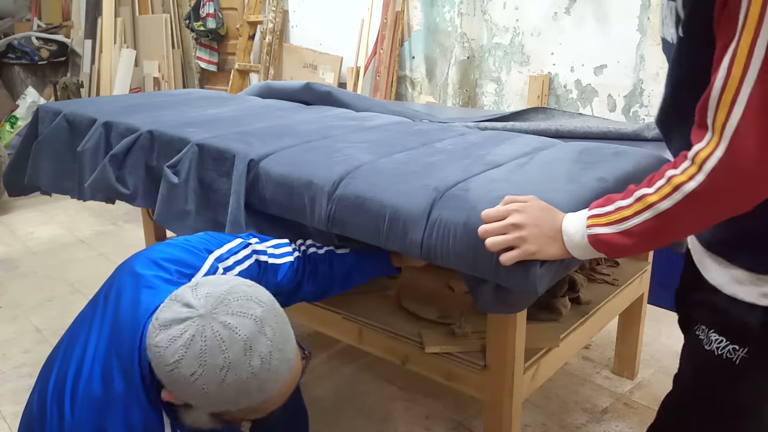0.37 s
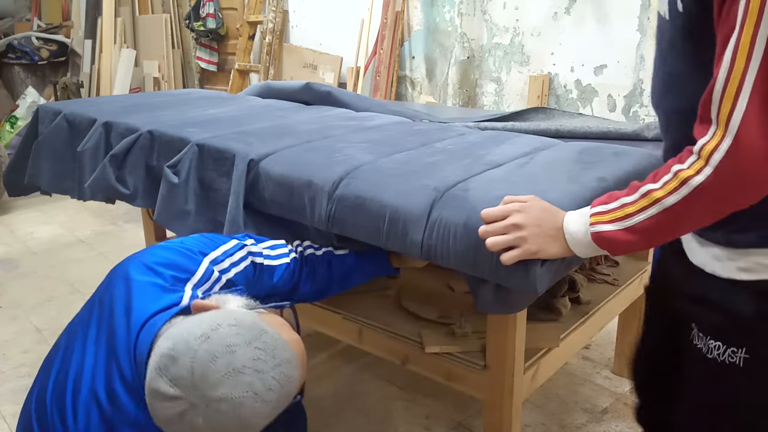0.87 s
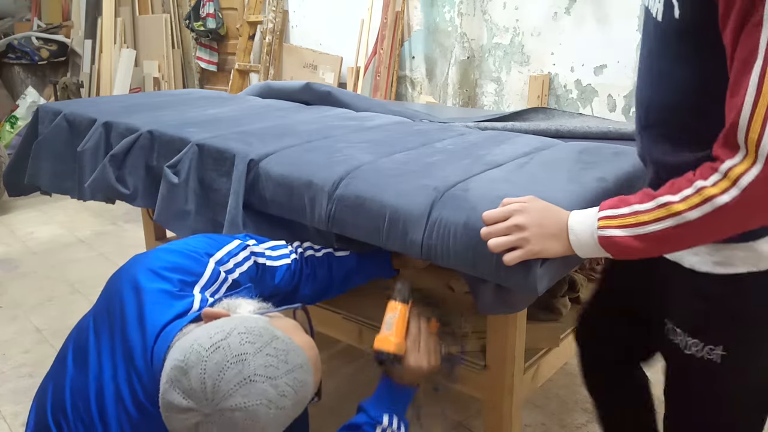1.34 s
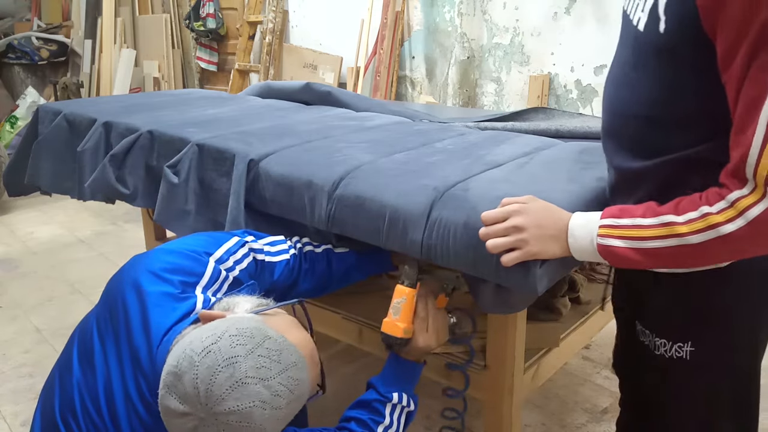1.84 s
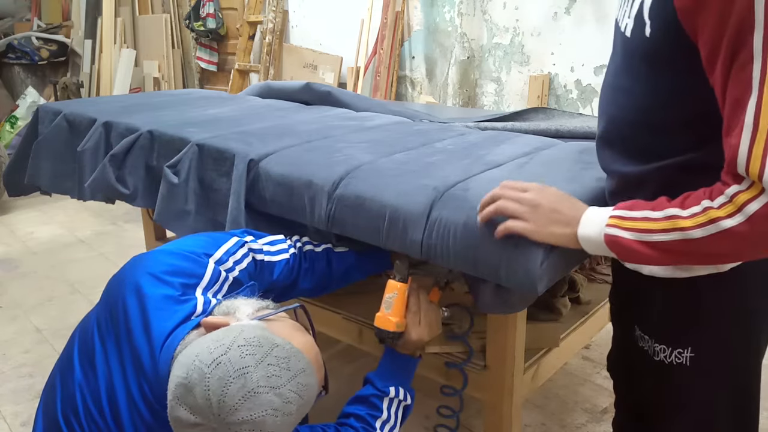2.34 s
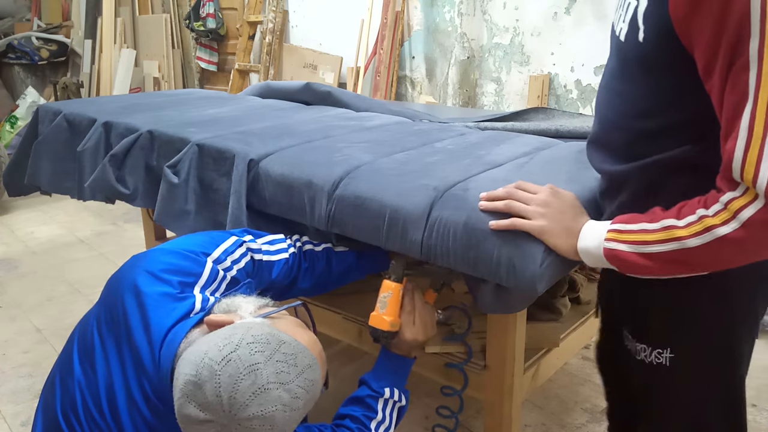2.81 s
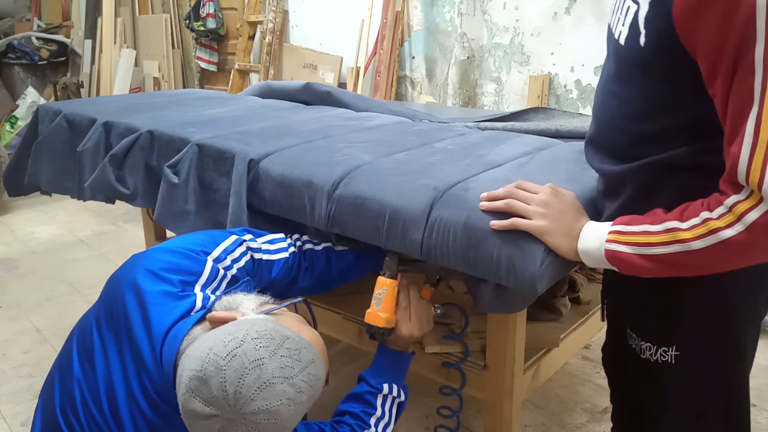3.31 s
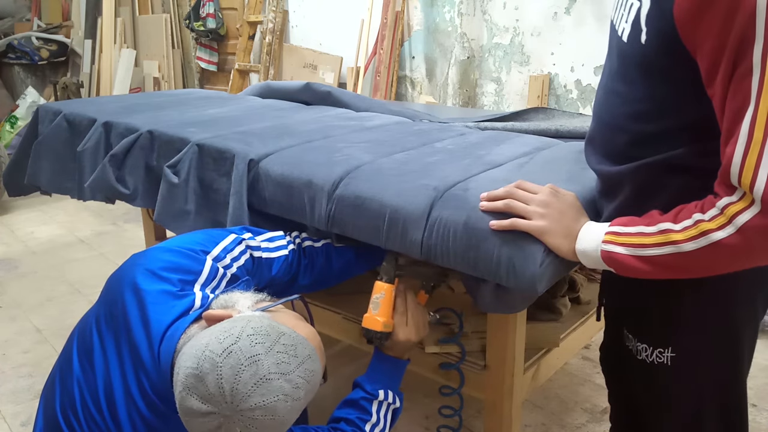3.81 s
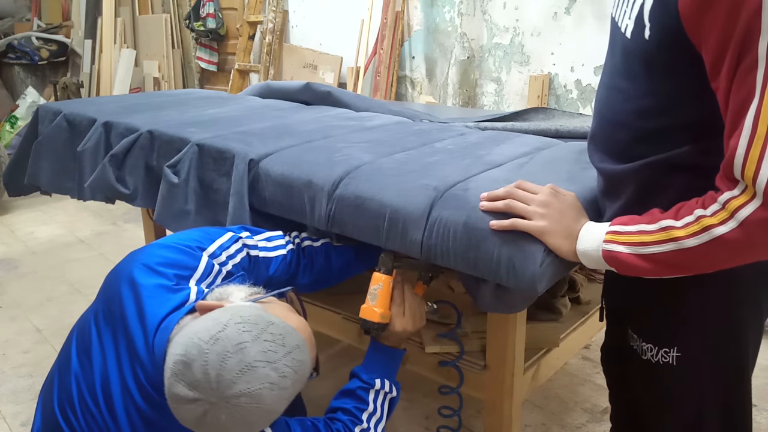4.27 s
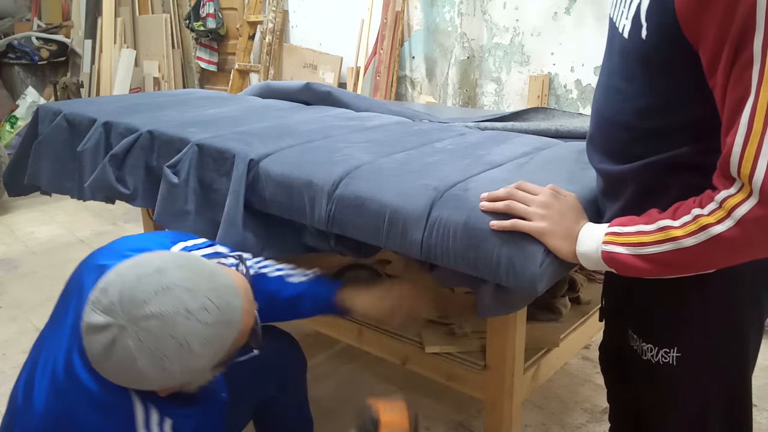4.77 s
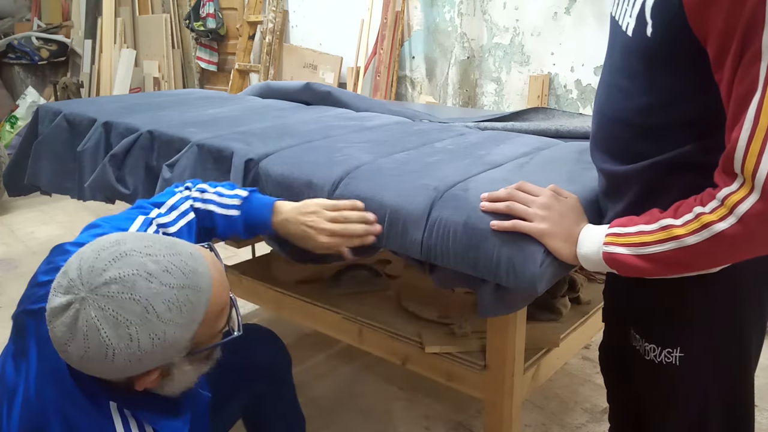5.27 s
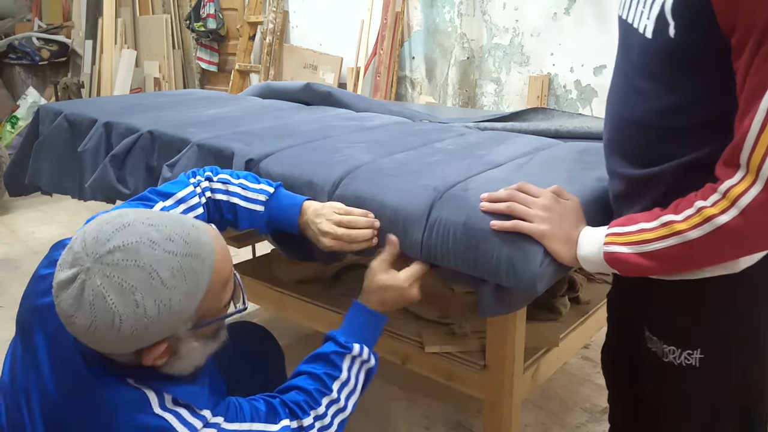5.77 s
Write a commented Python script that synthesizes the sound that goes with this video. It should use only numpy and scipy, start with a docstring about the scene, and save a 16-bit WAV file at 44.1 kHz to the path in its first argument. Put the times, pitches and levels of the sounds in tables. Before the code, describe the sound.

A bare, reverberant workshop with low air noise and very faint, wavering distant machine hum. Soft cloth and shoe scuffs begin at once, with small strokes around 0.25 s. From 0.68 to 0.84 s the gun knocks against wood in a quick clattering cluster with a short metallic ring. Brighter grainy rustles follow, strongest near 1.1 and 1.45 s, fading before 1.9 s. A pneumatic staple gun then fires at about 1.95, 2.53, 3.43 and 4.28 s. Each shot has a tiny valve tick, an abrupt dry crack into wood, a thin high leak for roughly 0.13-0.15 s, then a fierce, bright exhaust puff and small piston thud, with echoes dying over under a second. Faint handling ticks come at 4.8-4.9 s. At 5.1 s the gun lands on the hard floor with a loud double clunk. Quiet cloth movement and a low, lumpy rumble close the scene around 5.5-6 s.

```python
"""Staple gun in a workshop

A pneumatic staple gun drives four staples into a wooden frame in a bare, echoing workshop.
Each shot is shaped noise: valve tick, piston slam, leak while the trigger is held, exhaust puff.
Knocks ring the modes of the gun body; cloth and shoes scuff as grainy noise with swelling strokes.
Air noise and wavering machine tones lie below. A limiter rides the level."""
import sys
import numpy as np
from scipy import signal
from scipy.fft import rfft, irfft
from scipy.io import wavfile
from scipy.ndimage import uniform_filter1d, minimum_filter1d

SR = 44100
rng = np.random.default_rng(int(sys.argv[2]) if len(sys.argv) > 2 else 0)


def transcribe(signal):
    """Save signal, clipped to [-1, 1], as a 16-bit WAV file at the path in sys.argv[1]."""
    frames = np.atleast_2d(signal).T
    limited = np.clip(frames, -1, 1)
    pcm = np.round(limited * 32767).astype(np.int16)
    wavfile.write(sys.argv[1], SR, pcm)


N = 259308

# Shots: (piston blow [s], trigger held [s], valve tick [dB], blow [dB], exhaust [dB])
SHOTS = [(1.9452, .1300, -28.5, -6, -4), (2.5322, .1265, -26, -5.5, -6), (3.4278, .1412, -21, -7, -8),
         (4.2753, .1467, -29, -7.5, -5)]
# Spectrum of the piston blow: (frequency [Hz], relative density [dB per Hz])
BLOW_SPECTRUM = [(44, -32.5), (75, -7.5), (240, -8.5), (286, -4), (409, -4.5), (572, -7.5), (800, -3),
                 (1340, -5), (2730, -2.5), (4780, -7), (7300, -3.5), (9130, -12.5), (11400, -5.5),
                 (15600, -22)]
# Spectrum of the exhaust: (frequency [Hz], relative density [dB per Hz])
EXHAUST_SPECTRUM = [(350, -36), (600, -19.5), (1120, -13), (1960, -14), (3680, 0), (5030, -6), (6700, 5),
                    (7370, 6), (9420, -1.5), (10600, 0), (12200, -5), (14300, -7.5), (15800, -25.5)]
# Resonances of the valve leak: (frequency [Hz], width [Hz], relative level [dB])
LEAK_RESONANCES = [(11300, 1900, 9.5), (6836, 400, 9), (13500, 480, -19.5)]
# Sharp core of the exhaust: (delay [s], swell [s], steady [s], fade [s], share [1])
JET = (.007, .008, .003, .003, .55)
# Broader rush around the core: (swell [s], steady [s], fade [s])
VENTING = (.003, .015, .016)
VALVE_LEAD_S = .016   # the valve ticks this long before the blow
LEAK_DB, REBOUND_DB, REBOUND_AFTER_S = -19.5, -9, 0.015   # against the blow
THUD_DB, THUD_AFTER_S = -9.5, .028   # piston return against the exhaust
BLOW_ECHO_DB, PUFF_ECHO_DB = -20, -24   # echoes against their sources


def staple_gun(room):
    """Impact and jet noise: valve tick, blow, one rebound in the wood, leak, exhaust, piston return."""
    blow, puff, white = coloured(BLOW_SPECTRUM), coloured(EXHAUST_SPECTRUM), rng.standard_normal(N)
    crackle = from_db(4.4 * drift(1500))   # the blow is a cluster of metal and wood contacts
    leak = rms_one(sum(from_db(db) * resonance(white, hz, width) for hz, width, db in LEAK_RESONANCES))
    valve = coloured(BLOW_SPECTRUM, tilt_db=4.0)
    thud = rms_one(resonance(rng.standard_normal(N), 800, 1200))
    jet_delay, *jet_times, jet_share = JET
    out = np.zeros(N)
    for hit, held, trigger_db, blow_db, vent_db in SHOTS:
        trigger, vent = hit - VALVE_LEAD_S, hit + held
        back = vent + THUD_AFTER_S
        tick = swell(trigger, .0015, .001, .003)
        tick += .35 * swell(trigger, .002, hit - trigger, .002)   # weaker noise up to the blow
        out += from_db(trigger_db) * valve * tick

        out += from_db(blow_db) * blow * crackle * swell(hit, .002, .005, .0025)
        out += echo_of_hit(hit, blow_db + BLOW_ECHO_DB, BLOW_SPECTRUM, room)
        out += from_db(blow_db + REBOUND_DB) * thud * swell(hit + REBOUND_AFTER_S, .001, .003, .003)
        out += from_db(blow_db + LEAK_DB) * leak * swell(hit, 0.0056, vent - hit, 0.0045)

        jet = jet_share * swell(vent + jet_delay, *jet_times)
        rush = (1 - jet_share) * swell(vent, *VENTING)
        out += from_db(vent_db) * puff * (jet + rush)
        out += echo_of_hit(vent + .008, vent_db + PUFF_ECHO_DB, EXHAUST_SPECTRUM, room)
        out += from_db(vent_db + THUD_DB) * thud * swell(back, .001, .002, .002)
        out += echo_of_hit(back, vent_db + THUD_DB + BLOW_ECHO_DB, BLOW_SPECTRUM, room)
    return out


# The gun knocks on wood and floor: (time [s], click level [dB], body ring against the click [dB],
# echoes against the click [dB], pitch that the blow favours [Hz])
KNOCKS = [(0.677, -32, -8.5, -25.5, 600), (0.7213, -24, -11, -30.5, 3400), (0.7927, -19, -9.5, -30.5, 5965),
          (0.8355, -20.5, -16, -36, 1500), (1.908, -40, -20, -26.5, 7000), (3.395, -55.5, -13, -31.5, 7060),
          (4.833, -43, -12.5, -34.5, 7000), (4.924, -48, -9, -28.5, 7000),
          (5.073, -46.5, -11.5, -31.5, 5400), (5.104, -10.5, -8, -32, 499.5),
          (5.121, -19, -10, -34.5, 3400)]
# Modes of the gun body: (frequency [Hz], relative level [dB], t60 [s])
GUN_BODY_MODES = [(225, -6.5, 0.073), (1500, 3.5, 0.05), (3407, 1, 0.045), (5400, -25, 0.015),
                  (7088, 4.5, 0.019)]
# Spectrum of a knock on the wooden shelf: (frequency [Hz], relative density [dB per Hz])
SHELF_SPECTRUM = [(35, -59.5), (60, -38.5), (222, 3), (715, -7), (1470, -4.5), (1860, -12), (2650, -7),
                  (6900, -16), (12400, -26), (16000, -45.5)]
# Spectrum of a knock on the hard floor: (frequency [Hz], relative density [dB per Hz])
FLOOR_SPECTRUM = [(59, -50), (100, -19), (220, -1.5), (387, -8), (554, -12.5), (900, -13), (1200, -6),
                  (1450, -1.5), (1750, -8.5), (2430, -12.5), (3480, -8), (5540, -20.5), (8100, -12.5),
                  (15600, -37.5)]
FLOOR_FROM_S = 5   # from here on the echoes are those of the floor
FAVOUR_DB_PER_OCTAVE = 6   # modes away from the favoured pitch ring less


def knocks(room):
    """Modal excitation: a crack of a few ms, and body modes with new strengths at each knock; echoes."""
    crack, out = coloured(SHELF_SPECTRUM, tilt_db=2.0), np.zeros(N)
    for s, db, ring_db, echo_db, pitch_hz in KNOCKS:
        surface = SHELF_SPECTRUM if s < FLOOR_FROM_S else FLOOR_SPECTRUM
        out += from_db(db - 9.0) * crack * swell(s, .0004, 0.0017, 0.0036)
        out += echo_of_hit(s, db + echo_db, surface, room)

    times, click_db, ring_db, _, pitch_hz = np.array(KNOCKS).T
    at = np.round(times * SR).astype(int)
    for hz, level_db, t60 in GUN_BODY_MODES:
        chance_db = rng.normal(0, 2.66, len(at))
        off_pitch_db = FAVOUR_DB_PER_OCTAVE * np.abs(np.log2(hz / pitch_hz))
        clicks = np.full(N, 1e-18)
        clicks[at] = from_db(click_db + ring_db + level_db + chance_db - off_pitch_db)
        r, w = from_db(-60 / (t60 * SR)), 2 * np.pi * hz / SR   # pole radius and angle
        out += signal.lfilter([0, np.sin(w)], [1, -2 * r * np.cos(w), r * r], clicks)
    return out


# Strokes of cloth and shoes: (start [s], swell [s], steady [s], level [dB], brightness [dB])
SCUFFS = [(0.0, 0.0033, 0.179, -57, 3), (0.23, 0.0065, 0.0097, -38.5, 3.5), (.25, 0.0095, 0.011, -42, -8),
          (.45, .05, 0.24, -70, 5), (0.841, 0.0059, 0.0082, -41, 7), (0.95, .08, .03, -46.5, 1.5),
          (1.055, 0.046, 0.06, -37, -0.5), (1.305, 0.0667, .035, -43.5, 9),
          (1.428, 0.0254, 0.0467, -32.5, 4.5), (1.6, 0.0282, 0.0973, -41, 0),
          (1.8, .04, 0.099, -54.5, -10.5), (4.76, .05, 0.17, -55.5, -3), (5.035, .03, .02, -54, -7),
          (5.45, .05, 0.336, -59, -5), (5.752, .012, .1, -57, -36)]
# Spectrum of the friction: (frequency [Hz], relative density [dB per Hz])
SCUFF_SPECTRUM = [(59, -41), (100, -4), (197, -8), (234, -3), (558, 4), (1870, 3.5), (2170, 5), (4870, -4),
                  (7450, -4.5), (12400, -20.5), (16000, -31)]
STROKE_FADE_S, HISS_FADE_S = 0.0527, 0.032   # a stroke trails off, its hiss sooner


def scuffs():
    """Friction noise with random grain; a brighter stroke has more hiss over 4.5 kHz."""
    grain = from_db(0.6 * drift(300) + 1.3 * drift(40))
    low_pass, high_pass = (signal.butter(2, 4500, kind, fs=SR, output="sos") for kind in ("low", "high"))
    low = signal.sosfilt(low_pass, coloured(SCUFF_SPECTRUM))
    high = signal.sosfilt(high_pass, coloured(SCUFF_SPECTRUM))
    body, hiss = np.zeros(N), np.zeros(N)
    for s, rise, hold, db, bright_db in SCUFFS:
        body += from_db(db) * swell(s, rise, hold, STROKE_FADE_S)
        hiss += from_db(db + bright_db) * swell(s, rise, hold, HISS_FADE_S)
    return grain * (body * low + hiss * high)


# Faint thin tones that come and go: (start [s], steady [s], level [dB], frequency [Hz], width [Hz])
TONES = [(0.0, 0.3, -60.5, 806.4, 40), (.44, 0.126, -64, 1105, 24.1), (.44, 0.173, -60, 554.3, 25),
         (.975, 0.058, -53.5, 6560, 59.5)]
# Low lumpy rumble near the end: (start [s], swell [s], steady [s], fade [s], level [dB])
RUMBLE = (5.6, .13, .13, .1, -51)
TONE_SWELL_S, TONE_FADE_S = 0.0366, .04


def small_sounds():
    """Narrow-band noise: sharp resonances give wavering tones, broad low ones a lumpy rumble."""
    white, out = rng.standard_normal(N), np.zeros(N)
    for s, hold, db, hz, width in TONES:
        tone = rms_one(resonance(resonance(white, hz, width), hz, width))
        out += from_db(db) * swell(s, TONE_SWELL_S, hold, TONE_FADE_S) * tone
    *rumble_times, rumble_db = RUMBLE
    rumble = rms_one(resonance(resonance(rng.standard_normal(N), 216, 300), 226, 300))
    return out + from_db(rumble_db + 1.7 * drift(40)) * swell(*rumble_times) * rumble


# Spectrum of the workshop noise: (frequency [Hz], relative density [dB per Hz])
AIR_SPECTRUM = [(20, -23), (50, -7), (84, -5.5), (200, -8), (400, -6), (800, -11.5), (1500, -15.5),
                (2600, -14.5), (3700, -16.5), (4600, -34), (7200, -29.5), (9500, -40.5), (16000, -52.5)]
# Distant machine tones: (frequency [Hz], peak level [dB])
HUM = [(199.5, -60), (301, -65.5), (371.4, -61.5), (743, -65.5)]
AIR_DB = -54.5


def background():
    """Stationary noise of the workshop air plus machine tones wavering in level and phase."""
    t = np.arange(N) / SR
    out = from_db(AIR_DB + 1.6 * drift(3.87)) * coloured(AIR_SPECTRUM)
    for hz, db in HUM:
        out += from_db(db + 1.5 * drift(9)) * np.sin(2 * np.pi * hz * t + 1.1 * drift(9))
    return out


# Reverberation time of the workshop: (frequency [Hz], t60 [s])
ROOM_T60 = [(60, 1.0), (200, 1.0), (500, 0.861), (1200, 0.7527), (3000, 0.7014), (7500, 0.5514),
            (15000, 0.32)]
EDGES_HZ = 25 * 2 ** np.arange(0, 9.6, .5)


def room_bands():
    """Reverberant decay by frequency: half-octave filters, each with its decay over one second."""
    t, bands = np.arange(SR) / SR, []
    for low, high in zip(EDGES_HZ, EDGES_HZ[1:]):
        decay = np.exp(-np.log(1000) * t / at_hz(ROOM_T60, np.sqrt(low * high)))
        bands.append((signal.butter(2, [low, high], "band", fs=SR, output="sos"), decay))
    return bands


def room_echoes(bands):
    """Diffuse impulse response: noise bands, each dying at its own rate, building up over some ms."""
    t = np.arange(SR) / SR
    white = rng.standard_normal((2, SR))
    echoes = sum(signal.sosfilt(band, white[k % 2]) * decay for k, (band, decay) in enumerate(bands))
    echoes = echoes * from_db(1.8 * drift(250, size=SR) * np.exp(-t / 0.092))   # early single walls stand out
    return rms_one(echoes * np.clip((t - .006) / 0.0034, 0, 1)) / np.sqrt(SR)


def echo_of_hit(s, db, spectrum, room):
    """Diffuse reverberation: each short sound gets a freshly drawn echo tail, coloured by its spectrum."""
    tail, out, at = shaped(room_echoes(room), spectrum), np.zeros(N + SR), round(s * SR)
    ripple = np.interp(np.arange(SR // 2 + 1), np.arange(0, SR, 90), rng.standard_normal(SR // 90))
    tail = irfft(rfft(tail) * from_db(2.5 * ripple), SR)   # mild random ripple colours each echo tail
    fades = np.interp(np.arange(SR), [0, 300, SR - 4000, SR - 2000], [0, 1, 1, 0])
    out[at:at + SR] = from_db(db) * rms_one(tail) * fades
    return out[:N]


def workshop(x, room):
    """Reverberation by convolution: the echoes of the long sounds."""
    return signal.fftconvolve(x, room_echoes(room))[:N]


def from_db(db):
    """Decibel law: the gain of a level in dB."""
    return 10 ** (np.asarray(db) / 20)


def rms_one(x):
    """Normalisation by effective value: scale to rms 1."""
    return x / np.sqrt(np.mean(x ** 2) + 1e-20)


def at_hz(points, hz):
    """Logarithmic pitch scale: read a table on a log frequency axis."""
    table_hz, value = np.array(points).T
    return np.interp(np.log(hz), np.log(table_hz), value)


def shaped(x, spectrum, tilt_db=0):
    """Linear filtering: impose a spectrum, tilted in dB per octave about 3 kHz."""
    hz = np.maximum(np.arange(len(x) // 2 + 1) * SR / len(x), 10)
    gain = from_db(at_hz(spectrum, hz) + tilt_db * np.log2(hz / 3000))
    return irfft(rfft(x) * gain, len(x))


def coloured(spectrum, tilt_db=0):
    """Filtered white noise: a given spectrum at rms 1."""
    return rms_one(shaped(rng.standard_normal(N), spectrum, tilt_db))


def resonance(x, hz, width):
    """Damped resonator: one band-pass with gain 1 on top."""
    r = np.exp(-np.pi * width / SR)
    peak_one = np.array([1, 0, -1]) * (1 - r * r) / 2
    return signal.lfilter(peak_one, [1, -2 * r * np.cos(2 * np.pi * hz / SR), r * r], x)


def swell(start_s, rise_s, hold_s, fall_s):
    """Exponential decay: an envelope that rises evenly, holds and dies with time constant fall_s."""
    out, first = np.zeros(N), int(np.clip(start_s * SR, 0, N))
    last = min(N, first + int((rise_s + hold_s + 12 * fall_s) * SR))
    t = np.arange(first, last) / SR - start_s
    decay = np.exp(-np.maximum(t - rise_s - hold_s, 0) / fall_s)
    out[first:last] = np.clip(t / rise_s, 0, 1) * decay
    return out


def drift(rate, size=N):
    """Random fluctuation: straight lines between chance values of spread 1, rate of them a second."""
    knots = np.arange(0, size + SR, SR / rate)
    return np.interp(np.arange(size), knots, rng.standard_normal(len(knots)))


SOFT_ROOM_DB = -8.5   # echoes of the soft sounds against their source


def scene():
    """Superposition: hits and puffs carry their own echoes; the soft sounds get a share of the room."""
    room = room_bands()
    soft = scuffs() + small_sounds()
    soft_echoes = from_db(SOFT_ROOM_DB) * workshop(soft, room)
    return (staple_gun(room) + knocks(room) + soft + soft_echoes + background())[None]


def roll_off(x):
    """The treble ends steeply here."""
    return signal.sosfilt(signal.butter(12, 16820, fs=SR, output="sos"), x)


LIMIT_DB, SQUEEZE = -22, .34   # threshold; share of the excess in dB that is taken off
RELEASE_DB_S, AHEAD_S, GLIDE_S = 177.5, .015, .007   # fall of the held level; look-ahead; smoothing


def record(dry):
    """Dynamic range control: bass cut, look-ahead limiter with gradual release, soft saturation."""
    dry = signal.sosfilt(signal.butter(2, 70, "high", fs=SR, output="sos"), dry)
    level_db = 10 * np.log10(uniform_filter1d(dry[0] ** 2, round(.006 * SR)) + 1e-12)
    fall = RELEASE_DB_S * np.arange(N) / SR
    held_db = np.maximum.accumulate(level_db + fall) - fall
    cut_db = -SQUEEZE * np.maximum(held_db - LIMIT_DB, 0)
    ahead = round(AHEAD_S * SR)
    cut_db = minimum_filter1d(cut_db, ahead, origin=-(ahead // 2))   # the gain ducks before the peak arrives
    cut_db = uniform_filter1d(cut_db, round(GLIDE_S * SR))
    mix = 0.7704 * np.tanh(dry * from_db(cut_db) / 0.8733)
    return roll_off(mix)


dry = scene()
out = record(dry)
transcribe(out)
```